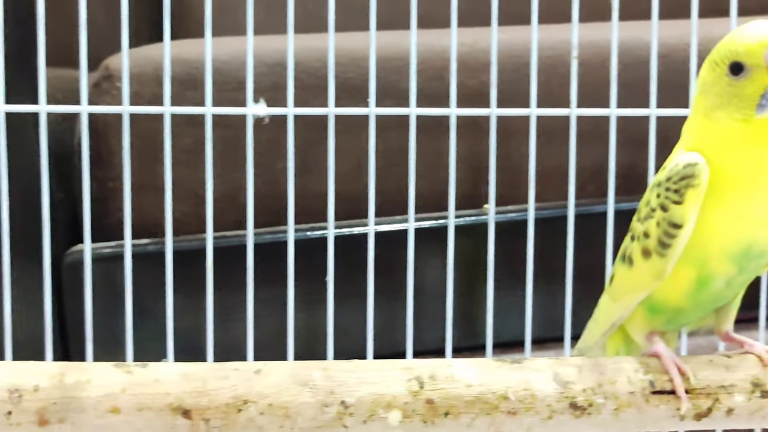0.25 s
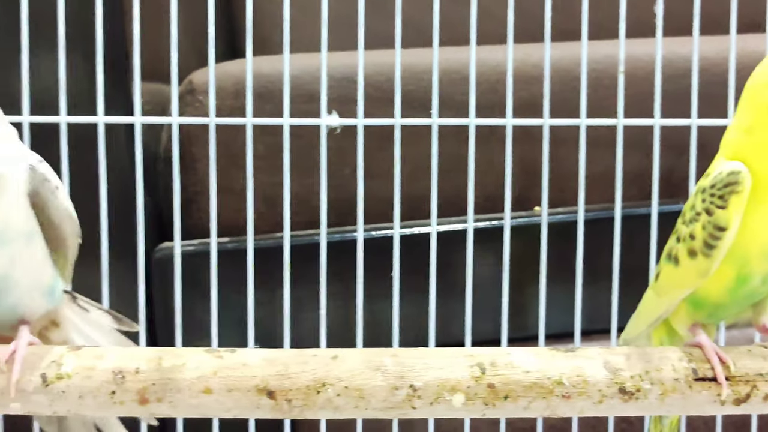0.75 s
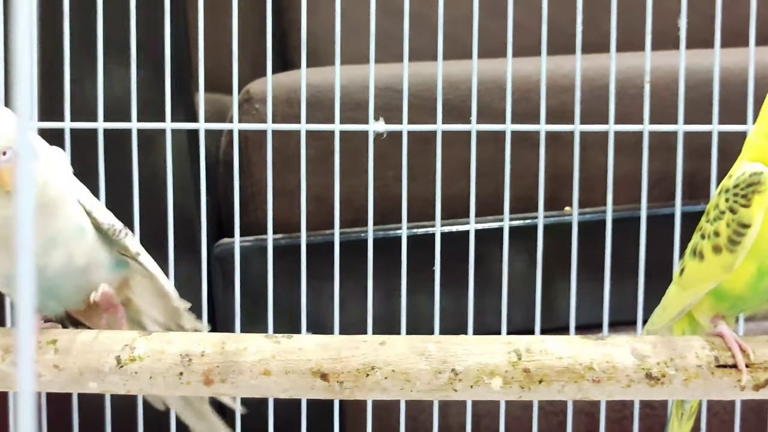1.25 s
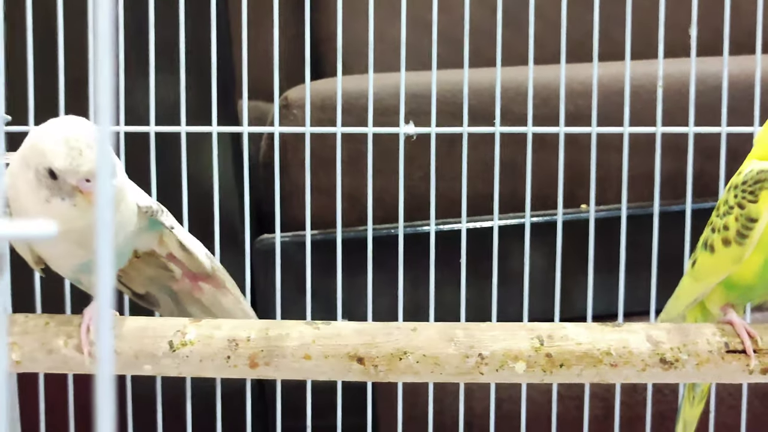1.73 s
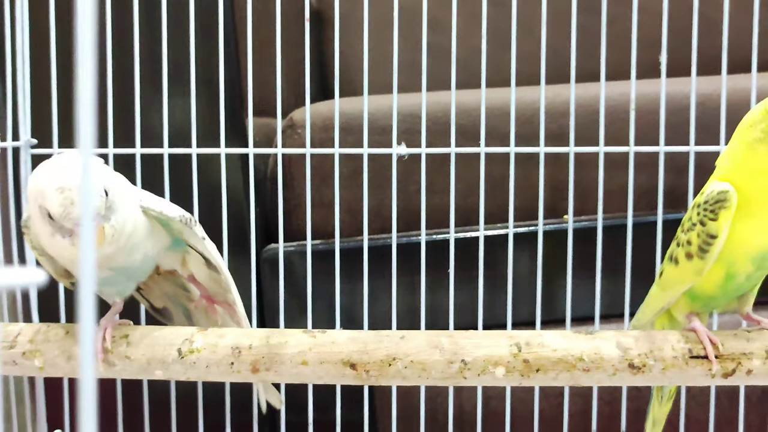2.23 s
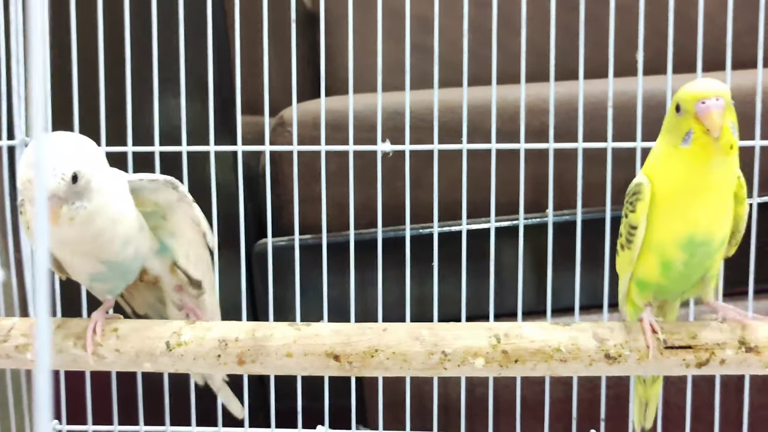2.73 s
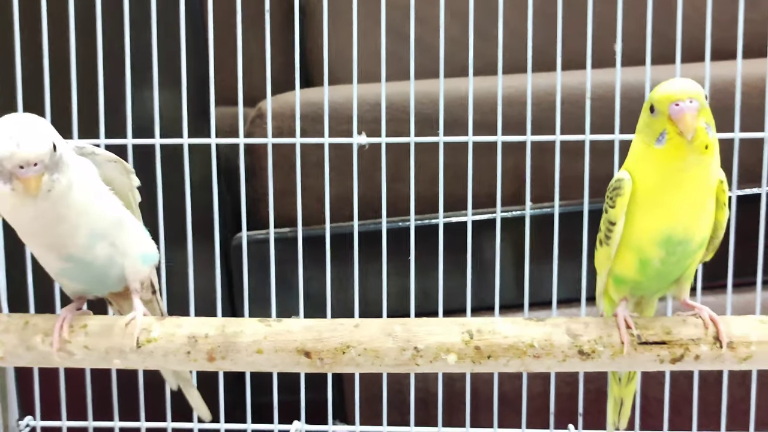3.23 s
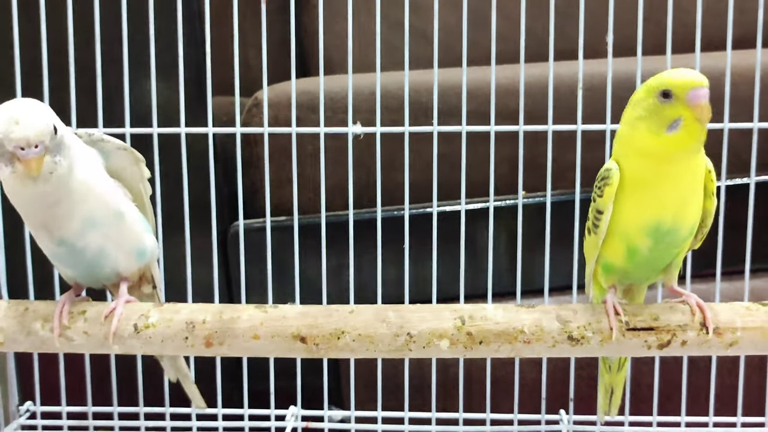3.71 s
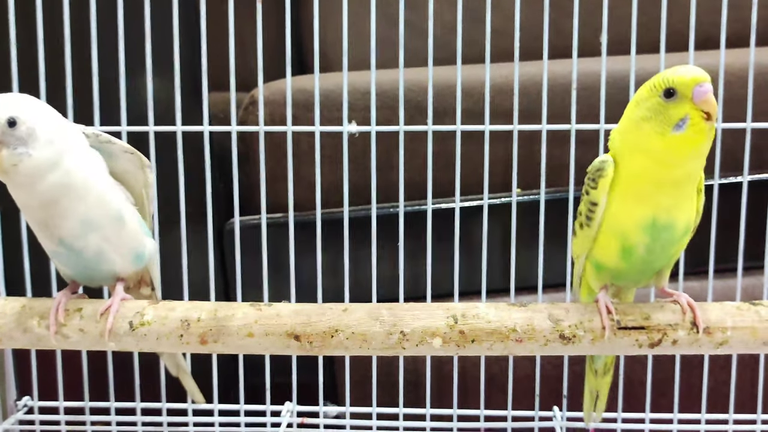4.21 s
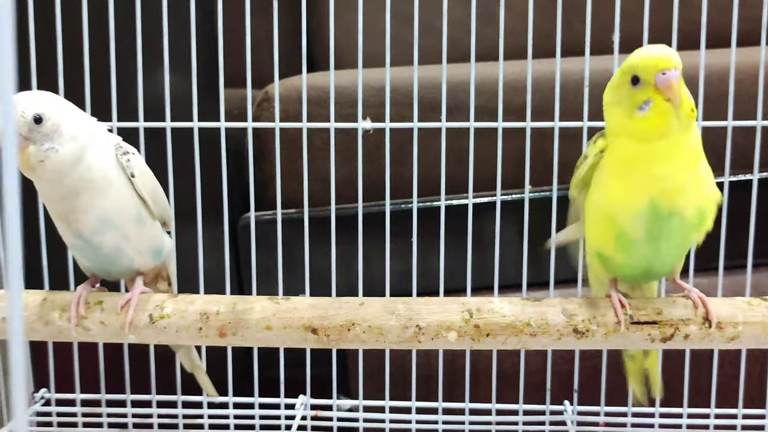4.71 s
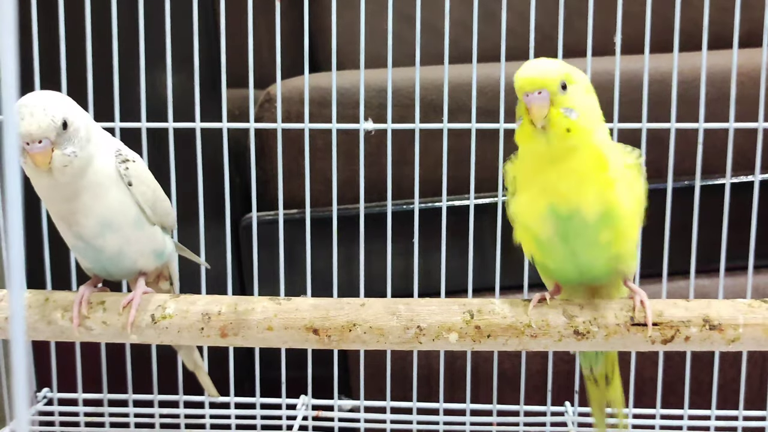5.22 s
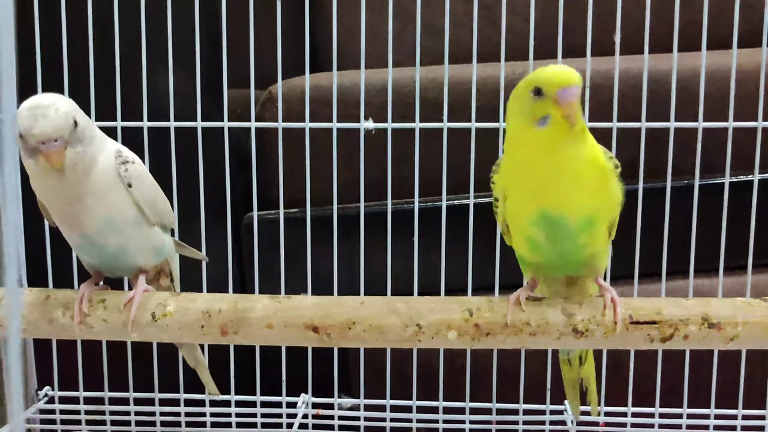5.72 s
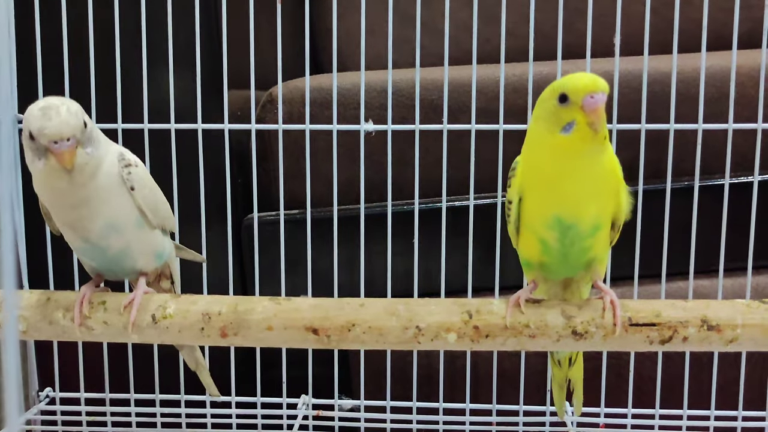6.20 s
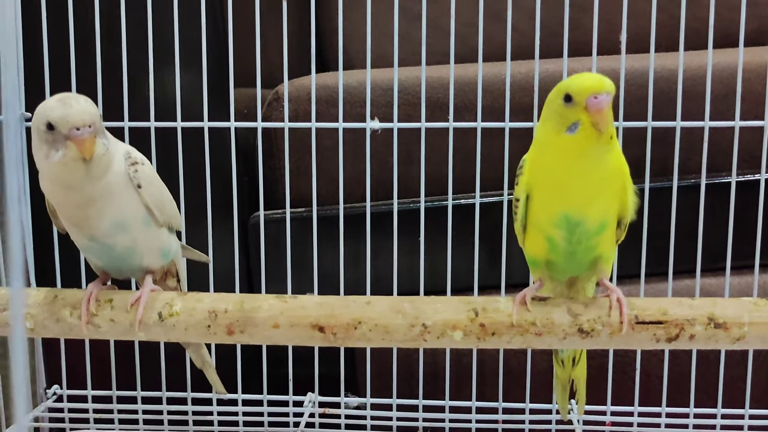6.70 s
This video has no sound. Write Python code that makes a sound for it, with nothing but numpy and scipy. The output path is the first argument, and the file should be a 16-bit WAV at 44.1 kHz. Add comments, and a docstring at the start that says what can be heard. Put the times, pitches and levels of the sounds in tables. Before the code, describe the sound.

Two small caged birds trade short, high chirps, one near and raspy, one soft and distant, over a low room rumble.

```python
"""Budgerigars in a wire cage in a small room. Over a low room rumble, a far bird chirps softly from the
start, and a near bird answers with the first of five loud, rasping chirps. Each chirp is a membrane
whistle shaped by the throat: a falling note, a dip, an arch, a held note, a low rasp (near bird only)
and a flick. Near two seconds something hollow is bumped. Then, as the calls go on, claws tick on perch
and wire and feathers are ruffled, until the far bird has the last chirp."""
import sys
import numpy as np
from scipy import signal
from scipy.fft import rfft, irfft, next_fast_len
from scipy.io import wavfile
from scipy.ndimage import uniform_filter1d, minimum_filter1d, map_coordinates

SR = 44100
rng = np.random.default_rng(int(sys.argv[2]) if len(sys.argv) > 2 else 0)


def store_pcm(level_fs):
    """Save levels as 16-bit WAV."""
    pcm = np.round(np.clip(level_fs, -1, 1) * 32767).astype(np.int16)
    wavfile.write(sys.argv[1], SR, np.atleast_2d(pcm).T)


N = 306495
TOP_HZ = 14300  # band limit
SIDES = np.array([[1], [-1]]) / 2  # splits a level or time difference between left and right

# The colour of feathers and claws. Each row: frequency in Hz, level in dB.
RUSTLE_SPECTRUM = [(160, -6), (400, -9.5), (800, -6.5), (1300, -6), (2300, 3.5), (4500, 0.5), (8000, -4.5),
                   (10000, -16.5), (13500, -7)]


def amp(db):
    """Decibels to gain."""
    return 10 ** (np.asarray(db) / 20)


def unit(x):
    """Scale to rms 1."""
    return x / np.sqrt(np.mean(x ** 2) + 1e-20)


def along(points, hz):
    """Read a curve of (Hz, value) points on a log frequency axis."""
    freqs, values = np.transpose(points)
    return np.interp(np.log(hz + 1), np.log(freqs + 1), values)


def filtered(x, response):
    """Pass x through a complex frequency response."""
    n = x.shape[-1]
    size = next_fast_len(n + SR // 4)
    return irfft(rfft(x, size) * response(np.fft.rfftfreq(size, 1 / SR)), size)[..., :n]


def noise(spectrum, shape):
    """Coloured noise of rms 1."""
    return unit(filtered(rng.standard_normal(shape), lambda hz: amp(along(spectrum, hz))))


def wobble(rate, n):
    """A smooth random curve, rate knots a second."""
    return map_coordinates(rng.standard_normal(n // 2), [np.arange(n) * rate / SR], mode="wrap")


def add(track, start_s, sound):
    """Mix a sound into a track."""
    part = track[..., max(round(start_s * SR), 0):][..., :sound.shape[-1]]
    part += sound[..., :part.shape[-1]]


def background():
    """Room rumble, nearly alike on both sides, under a faint steady hiss."""
    # The colours of rumble and hiss. Each row: frequency in Hz, level in dB.
    rumble_spectrum = [(25, -2), (50, -4.5), (80, -3), (115, 0), (180, 3.5), (230, -6), (400, -13.5),
                       (1000, -23.5), (2000, -40.5)]
    air_spectrum = [(1600, 1), (7000, -6.5), (10000, -18.5), (13000, -9.5)]
    rumble = noise(rumble_spectrum, N) + amp(-6) * noise(rumble_spectrum, (2, N))
    return amp(-55.5) * rumble + amp(-64.5) * noise(air_spectrum, (2, N))


def note(length_s, start_hz, middle_hz, end_hz, db, swell_db, rough):
    """Pitch, level and roughness of one smooth bend; at both ends the voice breaks, weaker and rougher."""
    u = np.linspace(-1, 1, max(round(length_s * SR), 2))
    pitch = middle_hz + u * (end_hz - start_hz) / 2 + u ** 2 * ((start_hz + end_hz) / 2 - middle_hz)
    voice_break = u ** 4
    return np.array([pitch, db + swell_db * u / 2 - 3 * voice_break, rough + 0.3 * voice_break])


def chirp(whistle_s, whistle_db, held, hoarse, dip_hz=3351, rasp=(), flick_db=0, stretch=1):
    """Gate, pitch, level and roughness of the run of notes that both birds sing."""
    # Each note: start, middle and end pitch in Hz, level in dB, swell in dB, roughness from 0 to 1.
    whistle = (3199.5, 2850, 2480, -11, -1.5, 0.1746)
    dip = (3699.5, 3351, 3300.5, -6.5, -5.5, 0.09)
    arch = (3379, 3719.5, 2899.5, -7, 2, 0.23)
    flick = (2751, 3152, 3749, -11.5, 7, 0.32)
    held_s, held_hz, held_db = held
    fade_s, attack_s, wander = 0.0046, 0.012, 0.012
    # the added columns shift a note's pitch, level and roughness
    notes = [note(whistle_s, *whistle) + [[0], [whistle_db], [0]],
             note(stretch * 0.02, *dip) + [[dip_hz - dip[1]], [0], [hoarse]],
             note(stretch * 0.026, *arch) + [[0], [0], [hoarse]],
             note(held_s, 1.12 * held_hz, held_hz, held_hz, held_db, 0, 0.18 + hoarse / 2),
             *rasp,
             note(0.025, *flick) + [[0], [flick_db], [0]]]
    pitch, db, rough = uniform_filter1d(np.hstack(notes), size=64, axis=1)
    pitch = pitch * (1 + wander * wobble(110, len(pitch)))
    t = np.arange(len(pitch)) / SR
    onset = np.exp(-t / attack_s)  # the whistle starts soft and clean
    gate = np.sin(np.pi / 2 * np.clip(np.minimum(t, t[-1] - t) / fade_s, 0, 1)) ** 2
    return gate, pitch, db - 3 * onset, rough * (1 - onset)


def syrinx(pitch, rough, overtone_db, jitter, breath, slope_db):
    """A membrane whistle whose pitch and strength flutter when rough, heard through the throat."""
    # The resonances of windpipe and open beak. Each row: frequency in Hz, gain in dB.
    throat = [(300, -45), (1000, -23.5), (1700, -17), (2050, -7.5), (2600, -2), (3500, 8.5), (4100, -4.5),
              (4800, -2), (5700, -19.5), (8000, -19), (10500, -40), (13000, -18.5)]
    n = len(pitch)
    rough = np.clip(rough, 0, 1)
    phase = 2 * np.pi * np.cumsum(pitch * (1 + jitter * rough * wobble(1000, n))) / SR
    k = np.arange(1, 8)[:, None]
    doubled = np.clip((2400 - pitch) / 300, 0, 1)  # low notes double their period: weak odd partials
    source_db = slope_db * np.log2(k) + overtone_db * (k > 1) - 11 * doubled * (k % 2)
    gains = amp(along(throat, k * pitch) + source_db) * (k * pitch < TOP_HZ)
    gains /= np.sqrt((gains ** 2).sum(0) / 2)
    glints = amp(4 * (k * pitch > 4500) * np.array([wobble(70, n) for _ in k]))  # overtones come and go
    flutter = amp(rough * (5 * wobble(600, n) - 7))
    tone = (gains * glints * np.sin(k * phase)).sum(0) * flutter
    noise_share = np.clip(breath * rough ** 2, 0, 0.9)
    return np.sqrt(1 - noise_share) * tone + np.sqrt(noise_share) * noise(throat, n)


def far_bird():
    """Soft chirps without the low rasp, from a bird that faces away."""
    # Each row: start in seconds, level in dB, roughness scale, time stretch of dip and arch,
    # sweep around the held note from 0 to 1, held pitch in Hz, held accent, overtone lift in dB.
    calls = [(.022, -39, 1, 1, 0.91, 3042, -6, 3.5), (.265, -41.5, 1.08, 1.06, 0.97, 2953, -9, 2.5),
             (1.048, -40.5, 1.3, 1.08, 1, 2880, -6.5, 6.5), (1.23, -45, 0.75, 0.78, 0.61, 3463, -1.5, 6),
             (2.175, -41, 1.1, 0.95, 0.95, 2968, 0, 2), (2.402, -41.5, 1.2, 1, .9, 2932, -9, -1),
             (4.072, -41, 0.69, 1.2, 0.76, 3417, -2.5, -2), (6.0, -42, 0.54, 1.23, 0.55, 2990, 13.5, -8.5)]
    # The tone of a bird turned away. Each row: frequency in Hz, gain in dB.
    shade = [(2100, 8.5), (3700, 1.5), (4500, -6), (5300, 0.5), (7300, 14), (8500, -17.5), (12000, -38)]
    contrast = 0.54  # evens out the strength of the notes
    out = np.zeros(N)
    for start, level_db, rough_scale, stretch, sweep, held_hz, accent, bright_db in calls:
        held = (0.033, held_hz, accent)
        gate, pitch, contour, rough = chirp(0.037, 2.5, held, hoarse=0.25, stretch=stretch)
        pitch = held_hz + sweep * (pitch - held_hz)
        rough = rough * rough_scale
        overtone_db = bright_db + 8 * rough  # clean notes are the purest
        voice = syrinx(pitch, rough, overtone_db, jitter=0.13, breath=0.55, slope_db=-1.5)
        waver_db = 3 * wobble(70, len(pitch))
        add(out, start, gate * amp(level_db + contrast * contour + waver_db) * voice)
    return filtered(out, lambda hz: amp(along(shade, hz)))


def cage_wires(hz):
    """The frequency response of cage wires ringing in sympathy."""
    # Each row: resonance in Hz, width in Hz, relative level in dB.
    wires = [(2760, 31, -9), (3050, 22, -11), (5000, 31, -5.5)]
    return 1 + sum(amp(db + 2.5) * 1j * hz * width / (centre ** 2 - hz ** 2 + 1j * hz * width)
                   for centre, width, db in wires)


def room(x, early_db, early_t60):
    """Close surfaces answer at once; the room's tail follows, and the cage wires ring along."""
    # Each row: frequency in Hz, time to fall by 60 dB in seconds.
    decay_times = [(200, 0.31), (1500, 0.91), (3200, 0.49), (7000, 0.55), (13000, 0.22)]
    hz, frame_s, bands = signal.stft(rng.standard_normal((2, SR)), SR, nperseg=256)
    decay = amp(-60 * frame_s / along(decay_times, hz)[:, None])
    tail = signal.istft(bands * decay, SR, nperseg=256)[1][:, :SR]
    t = np.arange(SR) / SR
    tail *= 1 - np.exp(-t / 0.0009)
    early = rng.standard_normal((2, SR)) * amp(-60 * t / early_t60) * (t > 0.001)
    reflections = (unit(tail) + amp(early_db) * unit(early)) / np.sqrt(SR)
    return signal.fftconvolve(x[None], filtered(reflections, cage_wires), axes=1)[:, :N]


def beak_hiss(pitch, beak_hz, width_hz=860):
    """Air hisses through the beak, and high overtones ring out as they cross its resonance."""
    # The hiss on either side of the resonance. Each row: frequency in Hz, level in dB.
    hiss_spectrum = [(3000, -20.5), (5500, -10), (9500, -21.5), (11200, -25.5), (15000, -13.5)]
    air = noise(sorted([*hiss_spectrum, (beak_hz, 0)]), (2, len(pitch)))
    k = np.arange(4, 8)[:, None]
    phase = 2 * np.pi * np.cumsum(pitch * (1 + 0.017 * wobble(800, len(pitch)))) / SR
    resonance = np.exp(-((k * pitch - beak_hz) / width_hz) ** 2)
    return air + amp(1) * (resonance * np.sin(k * phase)).sum(0)


def near_bird():
    """Loud chirps with a low rasp and a sputtering hiss, reaching the left microphone first."""
    # One chirp a row in all four tables. Each row: start in seconds, level in dB, added roughness,
    # whistle length in seconds, whistle lift in dB, middle pitch of the dip in Hz.
    calls = [(0.583, 1, 0.04, 0.048, -2, 3400), (2.772, -2.5, 0, 0.051, 5, 3350),
             (3.059, -0.5, 0, .047, -1, 3420), (4.391, -1.5, 0.04, .047, 0, 3180),
             (4.719, -1, .08, .058, -1, 3200)]
    # The held note. Each row: length in seconds, pitch in Hz, level in dB.
    held_notes = [(.03, 3000, -12), (0.028, 2770, -6), (0.024, 2900, -12), (.025, 2740, -7),
                  (.027, 2650, -14.5)]
    # The rasp. Each row: length in seconds, pitch in Hz, level in dB, roughness, closing flick lift in dB.
    rasps = [(.034, 1950, -15.5, 0.9, -1), (.05, 2090, -16.5, .25, -0.5), (0.044, 1760, -7.5, 0.58, -0.5),
             (0.039, 1985, -12.5, .14, -5.5), (.045, 1800, -9.5, .12, 4)]
    # The bird's pose. Each row: left lead in ms, left over right in dB, beak resonance in Hz, hiss in dB.
    poses = [(0.487, 0.5, 13600, -29.5), (0.522, -1.5, 13470, -22.5), (0.4554, -1, 12200, -27.5),
             (0.427, -1.5, 13400, -29), (0.49, -0.5, 12500, -28.5)]
    sag = 0.035  # the rasp sinks from this share above its pitch to as far below
    out = np.zeros((2, N))
    for call, held, rasp_row, pose in zip(calls, held_notes, rasps, poses):
        start, level_db, hoarse, whistle_s, whistle_db, dip_hz = call
        rasp_s, rasp_hz, rasp_db, rasp_rough, flick_db = rasp_row
        lead_ms, pan_db, beak_hz, hiss_db = pose
        rasp = note(rasp_s, rasp_hz * (1 + sag), rasp_hz, rasp_hz * (1 - sag), rasp_db, 0, rasp_rough)
        gate, pitch, db, rough = chirp(whistle_s, whistle_db, held, hoarse, dip_hz, [rasp], flick_db)
        db, n = db + level_db, len(db)
        voice = amp(db - 2) * syrinx(pitch, rough, overtone_db=-2, jitter=0.091, breath=0.44, slope_db=-6)
        opening = np.sin(np.pi * np.arange(n) / n)  # the beak opens and closes over the chirp
        sputter_db = 3.5 * wobble(90, n)
        hiss = opening * amp(0.65 * db + hiss_db + 3 * rough + sputter_db) * beak_hiss(pitch, beak_hz)
        sound = gate * (voice + hiss * amp(3 * SIDES))
        arrival = filtered(sound, lambda hz: np.exp(2j * np.pi * hz * SIDES * lead_ms / 1000))
        add(out, start, amp(SIDES * pan_db) * arrival)
    return out


def bump():
    """One stuttering bump: a few quick contacts ring a dull, hollow body."""
    # Each row: start in seconds, level in dB.
    contacts = [(1.926, -36), (1.94, -36), (1.946, -27.5), (1.959, -42.5)]
    # Each row: frequency in Hz, level in dB, time to fall by 60 dB in seconds.
    body_modes = [(154.5, -8.5, 0.42), (266, -7, 0.28), (387, -14, 0.1), (532, -10, 0.089),
                  (735, -20, 0.15)]
    out, t = np.zeros(N), np.arange(SR // 2) / SR
    ring = sum(amp(db - 60 * t / t60) * np.sin(2 * np.pi * hz * t) for hz, db, t60 in body_modes)
    for start, db in contacts:
        add(out, start, amp(db) * ring)
    return out


def claws(t60=0.032):
    """Claws strike perch and wire in sharp ticks of noise."""
    # Each row: start in seconds, relative level in dB.
    ticks = [(2.713, -43), (5.1093, -35), (5.767, -44.5)]
    out, t = np.zeros((2, N)), np.arange(SR // 20) / SR
    for start, db in ticks:
        add(out, start, amp(db - 4.5 - 60 * t / t60) * noise(RUSTLE_SPECTRUM, (2, len(t))))
    return out


def feathers():
    """Ruffled feathers: fluttering rustles that swell and fade."""
    # Each row: start in seconds, end in seconds, level in dB.
    ruffles = [(3.331, 3.714, -50.5), (3.786, 3.952, -49), (4.113, 4.453, -48.5), (4.616, 5.275, -46.5),
               (5.202, 5.596, -43.5), (5.603, 5.827, -58)]
    out = np.zeros((2, N))
    for start, end, db in ruffles:
        n = round((end - start) * SR)
        swell = np.sin(np.pi * np.arange(n) / n)
        add(out, start, swell * amp(db + 0.83 * wobble(45, n)) * noise(RUSTLE_SPECTRUM, (2, n)))
    return out


def scene():
    """The near bird is mostly direct sound; the far one is mostly room and sits to the right."""
    near, far = near_bird(), far_bird()
    close = near + amp(-12) * room(near[0], early_db=3, early_t60=0.012)
    distant = amp(-6.5) * far + amp(-2) * room(far, early_db=-3, early_t60=0.06)
    return close + amp(-5 * SIDES) * distant + feathers() + claws() + bump() + background()


def record(dry):
    """The microphones bend loud sound slightly, a limiter holds the peaks, and the very top is cut off."""
    bent = dry + 0.025 * dry ** 2
    needed_gain = np.minimum(1, 0.85 / (np.abs(bent).max(0) + 1e-9))
    gain = uniform_filter1d(minimum_filter1d(needed_gain, size=260), size=130)
    return filtered(bent * gain, lambda hz: 1 / (1 + (hz / TOP_HZ) ** 120))


dry = scene()
out = record(dry)
store_pcm(out)
```